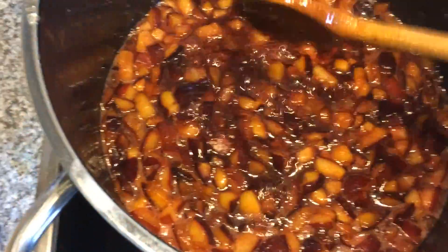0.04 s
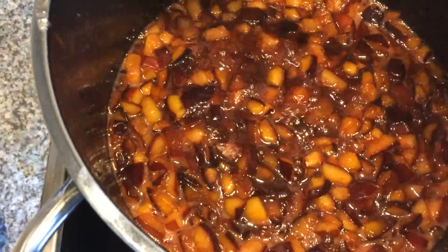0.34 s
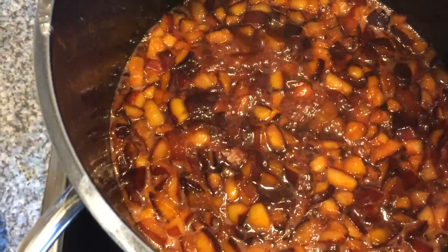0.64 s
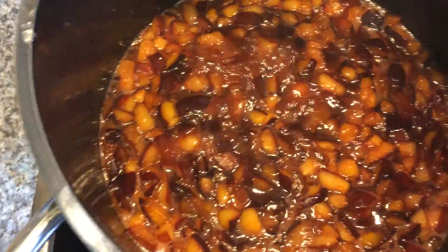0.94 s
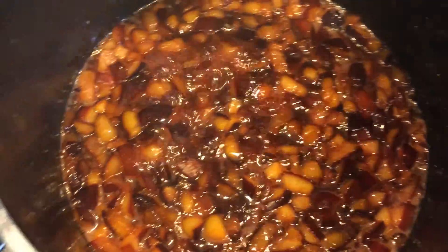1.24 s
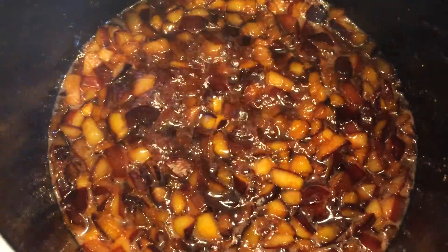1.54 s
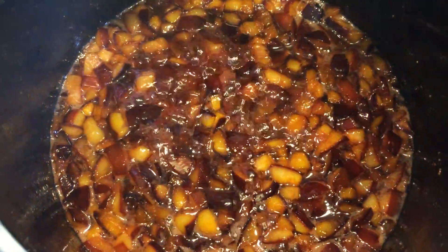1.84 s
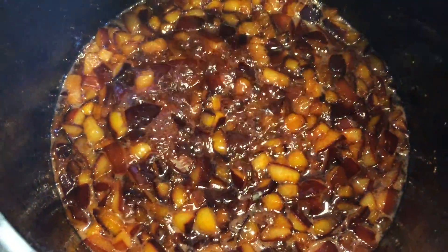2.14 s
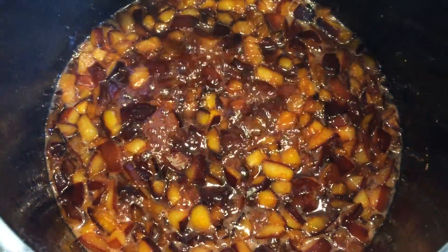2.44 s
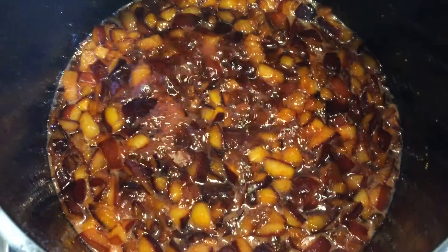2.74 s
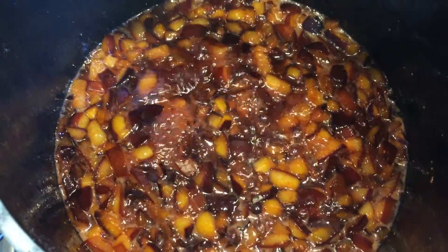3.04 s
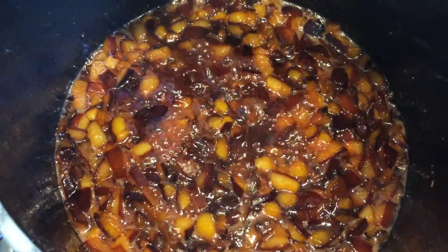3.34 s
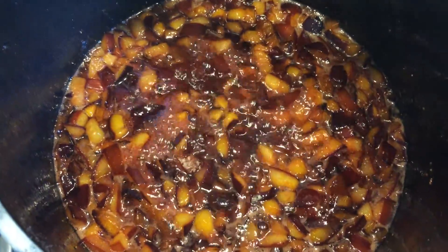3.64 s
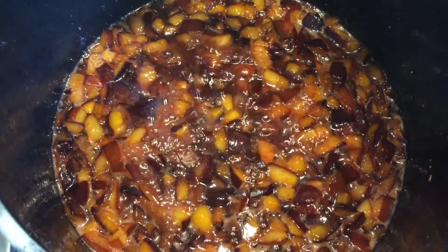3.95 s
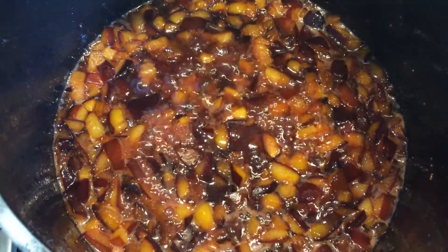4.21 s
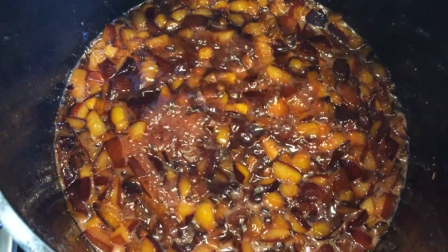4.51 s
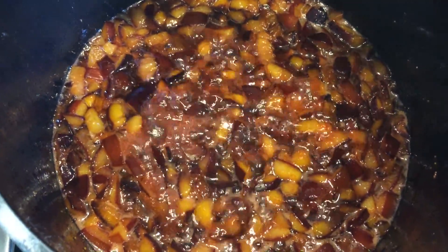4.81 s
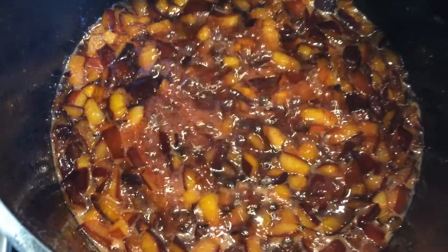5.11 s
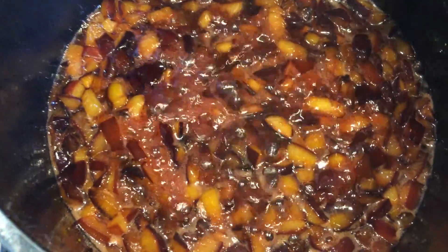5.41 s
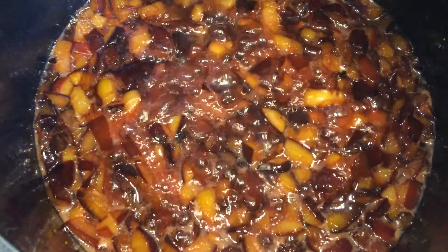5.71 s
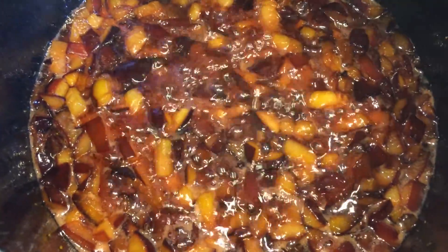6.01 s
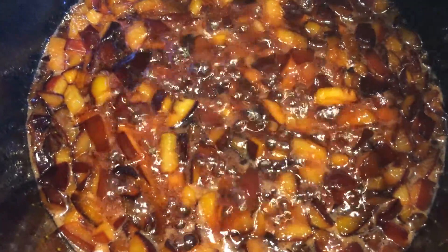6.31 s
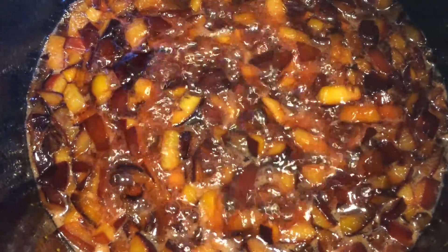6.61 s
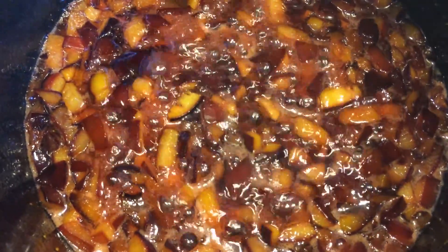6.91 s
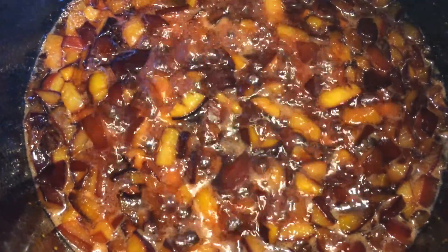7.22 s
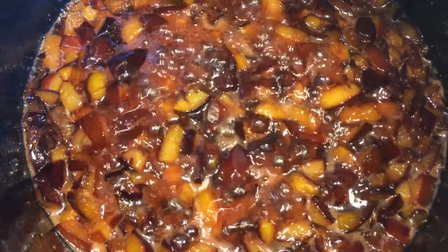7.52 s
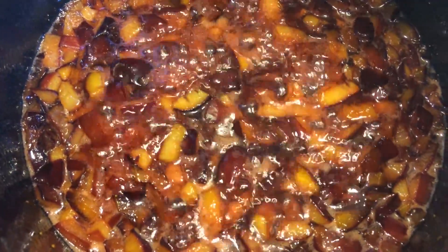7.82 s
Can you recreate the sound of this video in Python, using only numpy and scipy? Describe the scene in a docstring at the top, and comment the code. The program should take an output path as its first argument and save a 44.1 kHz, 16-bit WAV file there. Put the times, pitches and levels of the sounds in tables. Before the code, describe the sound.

A wooden spoon knocks on the rim of a steel pot at the very start, giving a brief metallic ring and a low boom from the stove. Thick jam then simmers quietly with a fine fizz and scattered plops. The bubbling grows steadily busier and louder, with wet pops, sharp little snaps and soft low thuds. It is heard up close in a small kitchen.

```python
"""A wooden spoon knocks on the rim of a steel pot: the wall rings and the stove top booms.
In the pot, thick plum jam comes to the boil. Steam bubbles plop open and thin films snap,
ever more busily, over a low simmer, a fine fizz and the thuds of steam lifting the jam.
The surface sounds echo between the steel walls and in a small kitchen."""
import sys
import numpy as np
from scipy import signal
from scipy.fft import rfft, irfft, next_fast_len
from scipy.io import wavfile
from scipy.ndimage import map_coordinates

SR = 44100
rng = np.random.default_rng(int(sys.argv[2]) if len(sys.argv) > 2 else 0)


def pcm_store(signal):
    """Save signal as 16-bit PCM."""
    levels = np.round(np.clip(np.atleast_2d(signal), -1, 1) * 32767)
    wavfile.write(sys.argv[1], SR, levels.astype(np.int16).T)


N = 346626
TOP_HZ = 15350


def amp(db):
    """Decibels to gain."""
    return 10 ** (np.asarray(db) / 20)


def unit(x):
    """x at rms 1."""
    return x / np.sqrt(np.mean(x ** 2) + 1e-20)


def burst(x):
    """x with the energy of 1 ms at rms 1."""
    return x / np.sqrt(np.sum(x ** 2) / (SR / 1000))


def along(points, hz):
    """(freq_hz, value) points read on a log axis."""
    freq_hz, values = np.transpose(points)
    return np.interp(np.log(hz + 1), np.log(freq_hz + 1), values)


def wobble(knots_per_s):
    """Smooth random curve."""
    return map_coordinates(rng.standard_normal(N // 50), [np.arange(N) * knots_per_s / SR], mode="wrap")


def filtered(x, response):
    """x through a complex frequency response."""
    size = next_fast_len(len(x) + SR // 2)
    return irfft(rfft(x, size) * response(np.fft.rfftfreq(size, 1 / SR)), size)[:len(x)]


def noise(spectrum, size=N):
    """Noise at rms 1, coloured by (freq_hz, density_db) points."""
    return unit(filtered(rng.standard_normal(size), lambda hz: amp(along(spectrum, hz))))


def fade(t, t60_s):
    """Exponential decay."""
    return np.exp(-np.log(1000) * t / t60_s)


def attack(t, rise_s):
    """Exponential rise to 1."""
    return 1 - np.exp(-t / rise_s)


def add(track, start_s, sound):
    """Mix a sound into a track; start_s may be negative."""
    start = round(start_s * SR)
    part = sound[max(-start, 0):N - start]
    track[max(start, 0):][:len(part)] += part


def ring(modes, t):
    """Decaying modes struck together, alternating in sign."""
    return sum(amp(db) * fade(t, t60_s) * np.sin(2 * np.pi * hz * t) * (-1) ** k
               for k, (hz, db, t60_s) in enumerate(modes))


def bubble(t, hz, cycles, rise):
    """A cavity rings briefly; its pitch climbs towards hz as the hole widens."""
    age = t * hz / np.maximum(cycles, .3)
    phase = 2 * np.pi * cycles * (age - rise * (1 - np.exp(-2 * age)) / 2)
    return np.sin(phase) * np.exp(-age) * (1 - np.exp(-2 * np.pi * hz * t))


def swarm(per_s, hz, spread_oct, cycles, rise, scatter_db, size):
    """Small bubbles of scattered pitch and strength, at rms 1; per_s is a curve."""
    draw = rng.random((12000, 4))[:int(per_s.mean() * N / SR)]
    start = np.searchsorted(np.cumsum(per_s) / per_s.sum(), draw[:, 0])
    pitch_hz = np.minimum(hz * 2 ** (spread_oct * (draw[:, 1] + draw[:, 2] - 1)), TOP_HZ)
    strength = amp(-scatter_db * np.log(draw[:, 3] + .06))
    waves = strength[:, None] * bubble(np.arange(size) / SR, pitch_hz[:, None], cycles, rise)
    samples = start[:, None] + np.arange(size)
    return unit(np.bincount(samples.ravel(), waves.ravel(), N)[:N])


def echoes(x, decay, delay_s, size):
    """A diffuse tail for each of four places on the surface; decay is (freq_hz, t60_s) points."""
    out = np.zeros(N)
    place = np.arange(N) // 2048 % 4
    for k in range(4):
        hz, t, bands = signal.stft(rng.standard_normal(size), SR, nperseg=128)
        tail = signal.istft(bands * fade(t, along(decay, hz)[:, None]), SR, nperseg=128)[1]
        add(out, delay_s, signal.fftconvolve(x * (place == k), tail / np.linalg.norm(tail)))
    return out


# room decay: freq_hz, t60_s
KITCHEN_DECAY = [(150, .35), (1000, .3), (5000, 0.17), (14000, 0.063)]


def reflections(x):
    """Sound flutters between the steel walls and dies away in the kitchen."""
    flutter = echoes(x, [(300, .012), (3000, .032), (14000, .016)], delay_s=.000769, size=2048)
    room = echoes(x, KITCHEN_DECAY, delay_s=.005, size=16384)
    return amp(-5.5) * flutter + amp(-21) * room


# air above the jam: centre_hz, width_hz, gain_db
AIR_MODES = [(513, 350, -9), (1050, 53, 6.5), (2065, 120, -7), (3310, 340, -12)]


def pot_air(x):
    """The air standing in the pot answers in a few broad modes."""
    return filtered(x, lambda f: sum(amp(db) * 1j * f * width / (hz * hz - f * f + 1j * f * width)
                                     for hz, width, db in AIR_MODES))


# growth of the boil: time_s, simmer_db, sputter_db
BOIL_LEVELS = [(.5, -61, -67), (2.7, -59.5, -67.5), (3.2, -58.5, -65), (5.2, -57, -64), (5.7, -56.5, -63),
               (6.3, -55.5, -60), (7.2, -56, -59), (7.86, -53.5, -60.5)]


def boil():
    """The boil builds: per-sample simmer_db, sputter_db and boil_db (sputter relative to its peak)."""
    time_s, *levels = np.transpose(BOIL_LEVELS)
    simmer_db, sputter_db = (np.interp(np.arange(N) / SR, time_s, db) for db in levels)
    return simmer_db, sputter_db, sputter_db - sputter_db.max()


# pot bottom: freq_hz, density_db
RUMBLE_SPECTRUM = [(20, -28), (35, -14.5), (50, -11), (70, -10), (100, -3.5), (122, 1.5), (140, 1.5),
                   (170, -19.5), (300, -41.5)]


def rumble(simmer_db):
    """The bottom of the pot rumbles, growing with the simmer."""
    level_db = -55 + .45 * (simmer_db - simmer_db.max()) + 1.2 * wobble(12)
    return amp(level_db) * noise(RUMBLE_SPECTRUM)


# steam pockets: start_s, level_db, pitch_hz
STEAM_POCKETS = [(1.219, -45, 131), (3.497, -47, 121), (4.38, -41, 123), (5.536, -43, 122),
                 (5.95, -41.5, 127), (6.474, -52, 117), (6.789, -38.5, 120), (7.169, -39.5, 135),
                 (7.649, -46.5, 122)]


def heaves(rise_s=.021, gain_db=-3.5):
    """A pocket of steam lifts the heavy jam and lets it settle: a soft, low thud."""
    out, t = np.zeros(N), np.arange(SR // 4) / SR
    swell = (t / rise_s * np.exp(1 - t / rise_s)) ** 2
    for start_s, db, hz in STEAM_POCKETS:
        add(out, start_s, amp(db + gain_db) * swell * np.sin(2 * np.pi * hz * t))
    return out


# inside the jam: freq_hz, density_db
SIMMER_SPECTRUM = [(120, -17.5), (200, -2), (275, -1.5), (320, -2), (400, -4.5), (470, 5), (560, -5),
                   (680, -11.5), (850, -20), (1080, -7), (1400, -22), (3000, -31)]


def simmer(simmer_db):
    """Bubbles deep inside, muffled by the jam."""
    deep = swarm(np.full(N, 120.), hz=430, spread_oct=.93, cycles=.77, rise=.15, scatter_db=5, size=1024)
    return amp(simmer_db) * (amp(-.54) * noise(SIMMER_SPECTRUM) + amp(-3) * deep)


# escaping steam: freq_hz, density_db
FIZZ_SPECTRUM = [(500, -14), (700, 0), (850, -3.5), (1080, -1), (1400, -2), (2100, -1.5), (2450, -2),
                 (2800, 0.5), (5000, -9), (7000, -7), (9500, -13), (14000, -23), (15500, -32)]


def fizz(steam_db):
    """Steam escapes unevenly in a fine, flickering hiss."""
    return amp(steam_db + .5 + 1.9 * wobble(45)) * noise(FIZZ_SPECTRUM)


def seethe(steam_db):
    """Tiny bubbles tick on the hot steel all the time."""
    ticks = swarm(190 * amp(2.6 * wobble(14)),
                  hz=5800, spread_oct=.92, cycles=4.2, rise=.41, scatter_db=5, size=200)
    return amp(-67 + .5 * (steam_db - steam_db.mean())) * ticks


def sputter(sputter_db, boil_db, steam_db):
    """Small bubbles surface and crackle, more often as the boil grows."""
    busy = amp(boil_db)
    blips = swarm(260 * busy, hz=2430, spread_oct=1.02, cycles=1.93, rise=.43, scatter_db=5.5, size=400)
    crackle = swarm(200 * busy * amp(4.6 * wobble(21)),
                    hz=8500, spread_oct=1.36, cycles=.62, rise=.31, scatter_db=9, size=64)
    return amp(sputter_db - 6) * blips + amp(steam_db - 3.5) * np.sqrt(busy) * crackle


def lesser(boil_db, per_s, db, hz, spread_oct, thinning, softening, scatter_db):
    """Random (start_s, level_db, pitch_hz) events, rarer and weaker below the full boil."""
    due = np.cumsum(per_s * amp(thinning * boil_db)) / SR
    draw = rng.random((400, 3))[:int(due[-1])]
    start = np.searchsorted(due, np.arange(len(draw)) + draw[:, 0])
    level_db = db + softening * boil_db[start] + scatter_db * (2 * draw[:, 1] - 1)
    pitch_hz = hz * 2 ** (spread_oct * (2 * draw[:, 2] - 1))
    return zip(start / SR, level_db, pitch_hz)


# loudest tearing films: start_s, level_db, nominal_pitch_hz
FILM_TEARS = [(.3047, -50, 5440), (.409, -51, 7000), (.593, -46.5, 2920), (1.1246, -50, 4740),
              (1.4436, -48.5, 6100), (1.467, -48, 7400), (1.6004, -45, 6800), (1.996, -50.5, 9100),
              (2.1623, -49, 4700), (2.4485, -50, 6700), (2.78, -46, 6000), (3.1447, -46.5, 7300),
              (3.2187, -43, 4500), (3.301, -37.5, 5300), (3.413, -48.5, 6000), (3.4663, -53, 8300),
              (3.513, -46, 7100), (3.5471, -42.5, 3530), (3.6428, -45, 8300), (3.738, -40, 5500),
              (3.8458, -41.5, 4700), (3.8695, -41.5, 5100), (4.0294, -44.5, 8900), (4.1084, -47, 7340),
              (4.1593, -45, 4530), (4.2123, -47, 9000), (4.2932, -44.5, 7900), (4.3387, -43.5, 5200),
              (4.4673, -43.5, 3740), (4.681, -38, 8500), (4.886, -43.5, 6100), (5.2348, -43.5, 7400),
              (5.3279, -50, 5100), (5.5827, -45, 6800), (5.8476, -39, 6340), (5.9797, -44, 5950),
              (6.114, -40.5, 4940), (6.2202, -47, 5500), (6.3294, -39, 5500), (6.3657, -40, 5100),
              (6.4309, -38.5, 9500), (6.486, -41.5, 7850), (6.6118, -38.5, 4370), (6.6808, -35.5, 4380),
              (6.7297, -38, 8750), (6.7689, -46, 7040), (6.8186, -32, 5760), (6.9344, -46, 5200),
              (7.126, -44, 3200), (7.152, -49, 4300), (7.239, -47, 5500), (7.271, -36.5, 3680),
              (7.642, -41, 6570), (7.6852, -42, 5600)]


def snaps(boil_db, gain_db=-4.5):
    """A tearing film gives one sharp tick and a spit of steam."""
    out, t = np.zeros(N), np.arange(1024) / SR
    spit_spectrum = [(1000, -17), (3500, 9.5), (8000, -3.5), (12000, 3.5), (15000, -.5)]
    small = lesser(boil_db, per_s=17, db=-46.5, hz=7501.5, spread_oct=.56,
                   thinning=.9, softening=.68, scatter_db=2.5)
    for start_s, db, hz in [*FILM_TEARS, *small]:
        tick = burst(bubble(t, hz * 1.08, cycles=.48, rise=.24))
        spit = burst(noise(spit_spectrum, len(t)) * fade(t, .0065))
        add(out, start_s, amp(db + gain_db) * (tick + spit))
    return out


# biggest bubbles: start_s, plop_db, pitch_hz, ring_cycles, gulp_db
BIG_BUBBLES = [(.59, -43, 1200, 2.5, -36.5), (.8018, -39, 1320, 3.1, -39),
               (1.6797, -50.5, 1360, 0.56, -45.5), (3.119, -37, 2480, 2.2, -52),
               (3.1624, -51, 1150, 3, -41.5), (3.1962, -38.5, 1140, 0.58, -50), (3.2527, -55, 2600, 2, -34),
               (3.289, -42.5, 2480, .7, -40), (3.3065, -43, 870, .7, -49), (3.3635, -42.5, 1150, 1.8, -41),
               (3.5833, -58, 790, 4.5, -37), (3.7383, -51, 1220, 3.8, -40), (3.8896, -38.5, 1050, 1, -46),
               (4.1076, -51, 1000, 2.2, -37), (4.4659, -33.5, 1390, 0.48, -43.5),
               (4.8098, -52, 650, 2.4, -42.5), (4.8853, -44, 1470, 0.89, -40), (5.1874, -51, 950, 3, -40),
               (5.306, -55, 645, 4.5, -34.5), (5.3463, -44, 1540, 4.5, -44),
               (5.5496, -45, 870, 0.82, -39.5), (5.6538, -39, 1780, 0.29, -31.5),
               (5.8853, -34, 1700, 0.92, -37.5), (5.9476, -29.5, 1150, 1.2, -36),
               (6.124, -39.5, 1690, 2, -54), (6.1484, -40, 1330, 1.1, -35.5),
               (6.3138, -42.5, 2610, .7, -38.5), (6.3655, -48, 2250, 4.5, -37),
               (6.6112, -40, 1530, 0.97, -40), (6.6798, -45, 2600, .7, -39.5),
               (6.7124, -34.5, 1270, 0.83, -49), (6.7504, -40, 1330, 1.7, -45),
               (6.8676, -36, 1325, 4.4, -34), (7.0915, -43, 2250, 1, -37.5),
               (7.1275, -37.5, 2360, .7, -35.5), (7.2123, -32.5, 2230, 3.2, -35),
               (7.2494, -41, 2150, 1.4, -45), (7.2702, -40.5, 2150, .7, -36.5),
               (7.3878, -36.5, 960, 0.56, -35), (7.4932, -41.5, 2600, 4.5, -54),
               (7.7747, -36.5, 1450, .8, -31.5)]


def pops(boil_db, gulp_hz=559, lead_s=.00402):
    """The skin gives way, the bubble plops open, its crater gulps lower and a little jam spatters."""
    out, t = np.zeros(N), np.arange(2048) / SR
    spatter_spectrum = [(300, 13), (1200, 5.5), (2600, -4), (4500, -12), (12000, -39)]
    events = lesser(boil_db, per_s=11, db=-43.5, hz=1752, spread_oct=1.1,
                    thinning=1.7, softening=1, scatter_db=3)
    small = [(start_s, db, hz, .7, db + 4) for start_s, db, hz in events]
    for start_s, db, hz, cycles, gulp_db in [*BIG_BUBBLES, *small]:
        skin = burst(bubble(t, hz, cycles=2, rise=.3))
        plop = burst(bubble(t, hz, cycles, rise=.4))
        gulp = burst(bubble(t, gulp_hz, cycles=2, rise=.25))
        spatter = burst(noise(spatter_spectrum, len(t)) * fade(t, .061) * attack(t, .0016))
        add(out, start_s - lead_s, amp(db - 16) * skin)
        add(out, start_s, amp(db) * (plop + amp(-4.5) * spatter) + amp(gulp_db) * gulp)
    return out


# spoon on the rim: start_s, ring_db, boom_db, crack_db
RIM_KNOCKS = [(-.07, -26.5, -20, -20), (.0416, -25.4, -15.8, -11)]
# pot wall: pitch_hz, level_db, t60_s
WALL_MODES = [(721, -17, .65), (815, -28, .55), (888, -25, .35), (1129, -3.5, .52), (1462, -26, 1.3),
              (1621, -25, 1.25), (1849, -23, .47), (2089, -32, .8), (2327, -12.5, .42), (2498, -24, .8),
              (2773, -17, .42), (2999, -16, .48), (3047, -13, .48), (3082, -1, .43), (3226, -15, .39),
              (3277, -11, .42), (3391, -5, .31), (3514, -3, .37), (3576, -12, .37), (3723, -12, .37),
              (4231, -19, .28), (4759, -19, .31), (5310, -6, .3), (5461, -7, .3), (5625, -7, .2),
              (6018, -13, .25)]
# dense wall modes: freq_hz, density_db
WALL_SPECTRUM = [(200, -14), (500, -21), (850, -13), (1600, -25), (2150, -20), (2650, -3), (2880, -11),
                 (3400, 2), (3980, -22), (4600, -10), (5500, -2), (6620, -24), (7600, -14), (9000, -26),
                 (15000, -41)]
# stove top: pitch_hz, level_db, t60_s
STOVE_MODES = [(52, -7.5, 0.2), (82.8, -15.5, 0.23), (96, -0.5, 0.33), (119, -10.5, 0.25), (140, -11, 0.47),
               (166, -10.5, 0.38), (216.7, -19, 0.25), (281, -21.5, 0.3), (389, -26, 0.26)]
# clack of wood on steel: pitch_hz, level_db, t60_s
CLACK_MODES = [(817, -18.5, .1), (2690, 0, 0.03), (3390, -2, 0.064), (4750, -7.5, 0.029), (7400, -7, .03)]


def spoon():
    """Each knock cracks, rings the steel wall and shakes the stove top under the pot."""
    out, t = np.zeros(N), np.arange(SR) / SR
    for start_s, ring_db, boom_db, crack_db in RIM_KNOCKS:
        out *= np.arange(N) < start_s * SR  # contact stills the earlier ring
        wall = ring(WALL_MODES, t) * attack(t, .0067)
        shimmer = noise(WALL_SPECTRUM, SR) * (amp(5.5) * fade(t, .085) + amp(-5.5) * fade(t, .34))
        boom = ring(STOVE_MODES, t) * attack(t, .006)
        contact = amp(-3) * noise(WALL_SPECTRUM, SR) * np.exp(-(t / .004) ** 2)
        crack = contact + ring(CLACK_MODES, t) * attack(t, .0006)
        add(out, start_s, amp(ring_db) * (wall + shimmer) + amp(boom_db) * boom + amp(crack_db) * crack)
    return out


def scene():
    """The boiling pot and the spoon, close by in a small kitchen."""
    simmer_db, sputter_db, boil_db = boil()
    steam_db = -62 + .61 * boil_db + 2.1 * wobble(16)
    body = rumble(simmer_db) + heaves() + simmer(simmer_db)
    ticks = seethe(steam_db) + sputter(sputter_db, boil_db, steam_db)
    hiss = fizz(steam_db)
    ticks += snaps(boil_db)
    surface = ticks + amp(1.5) * pot_air(ticks) + pops(boil_db)
    return (body + hiss + surface + reflections(surface) + spoon())[None]


def record(dry):
    """A small microphone thins the deepest bass and rounds the peaks; the band ends at TOP_HZ."""
    thinned = filtered(dry[0], lambda hz: (1j * hz / (1j * hz + 26)) ** 2)
    rounded = thinned / (1 + (thinned / .75) ** 6) ** (1 / 6)
    return filtered(rounded, lambda hz: 1 / np.sqrt(1 + (hz / TOP_HZ) ** 160))[None]


dry = scene()
out = record(dry)
pcm_store(out)
```